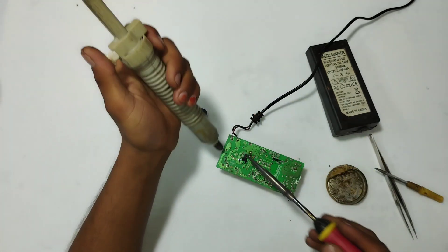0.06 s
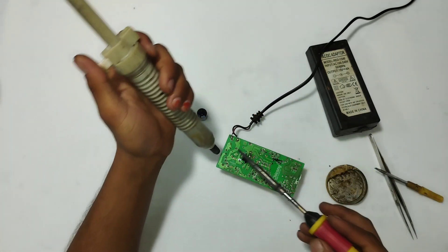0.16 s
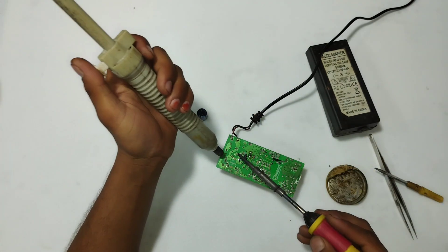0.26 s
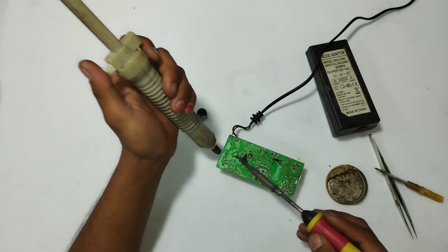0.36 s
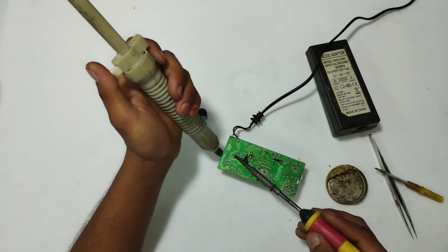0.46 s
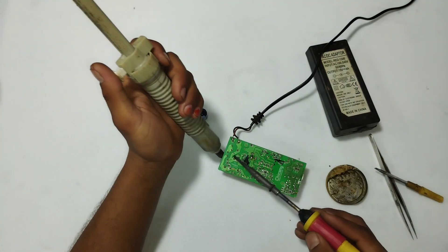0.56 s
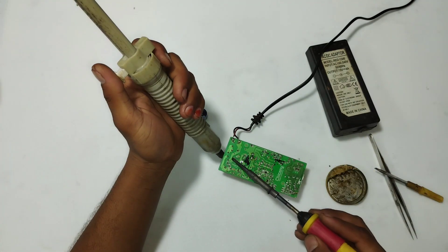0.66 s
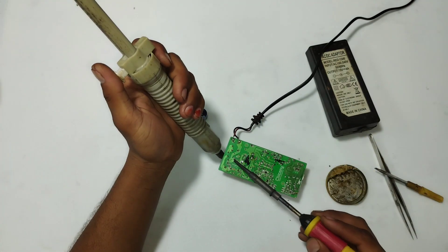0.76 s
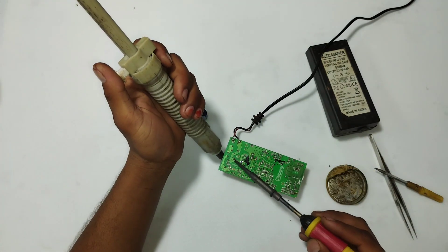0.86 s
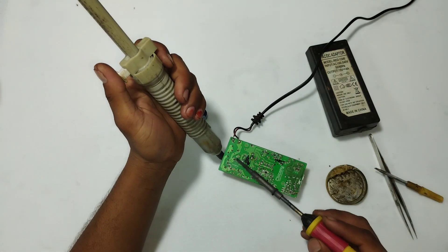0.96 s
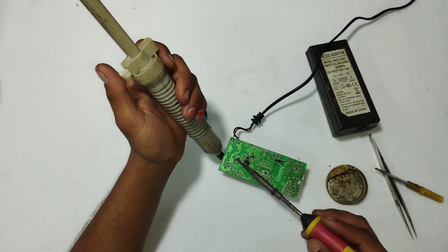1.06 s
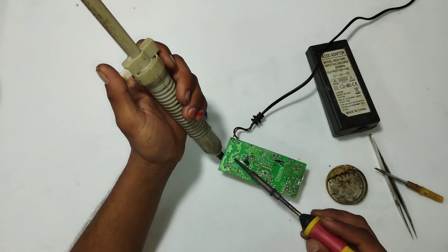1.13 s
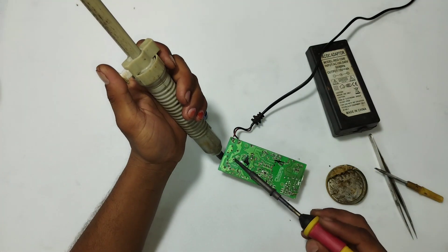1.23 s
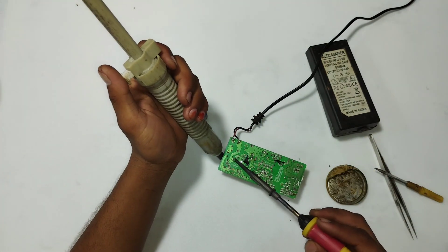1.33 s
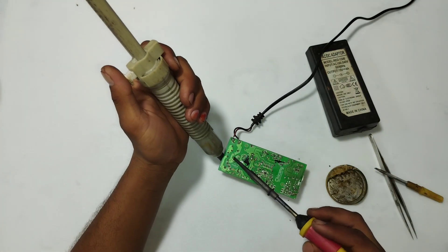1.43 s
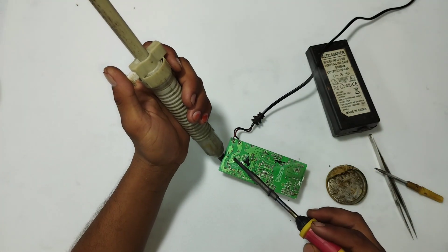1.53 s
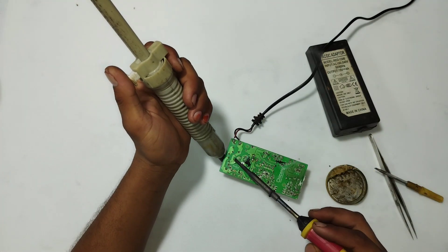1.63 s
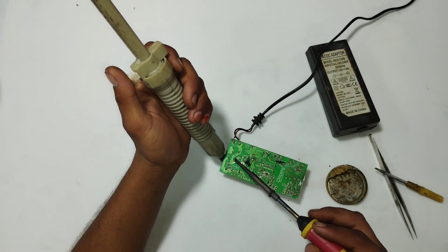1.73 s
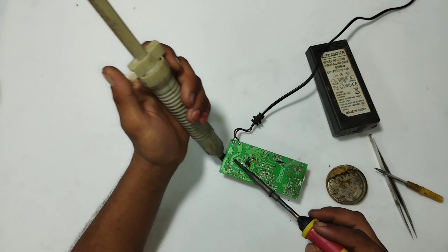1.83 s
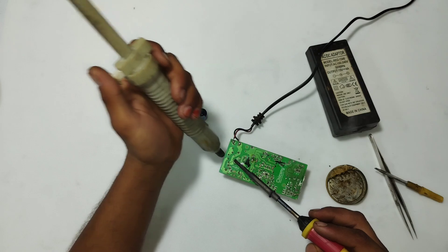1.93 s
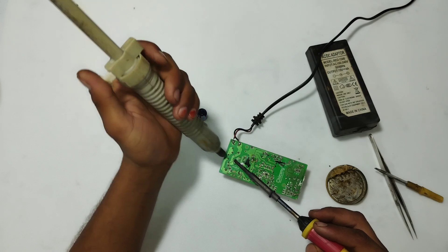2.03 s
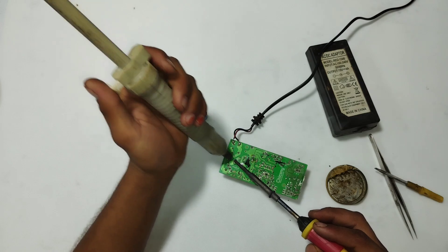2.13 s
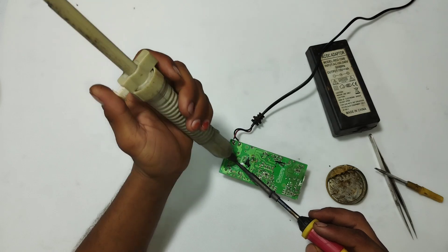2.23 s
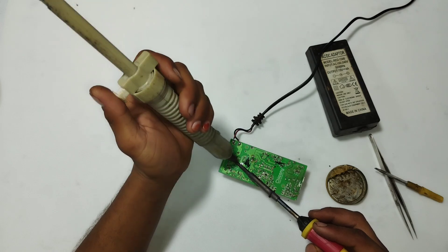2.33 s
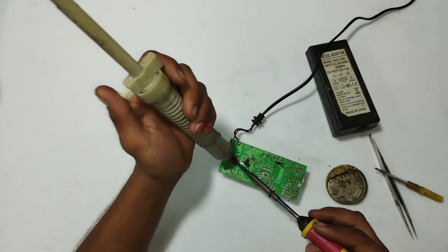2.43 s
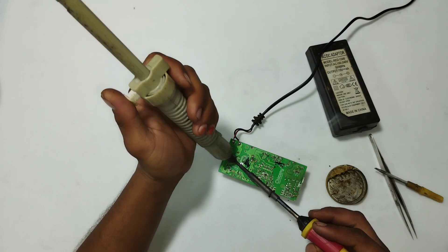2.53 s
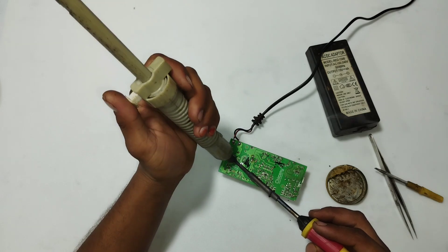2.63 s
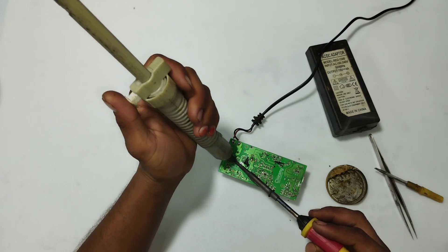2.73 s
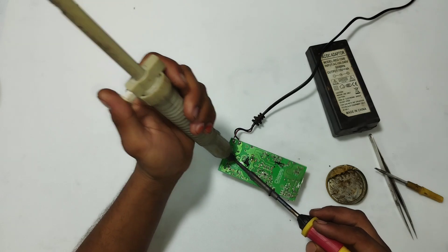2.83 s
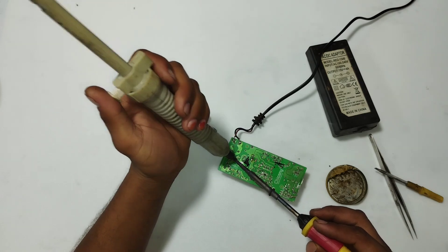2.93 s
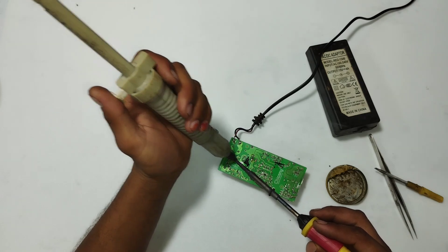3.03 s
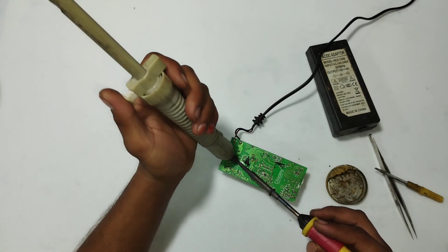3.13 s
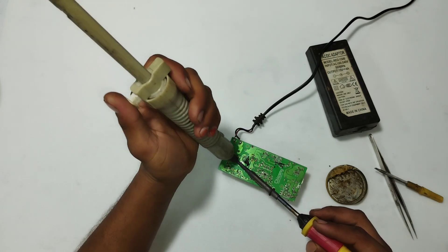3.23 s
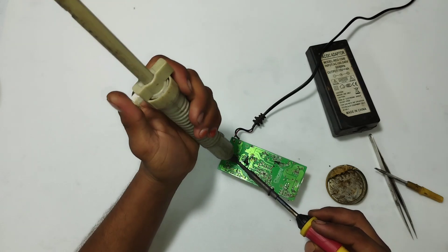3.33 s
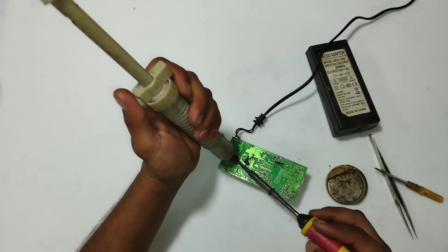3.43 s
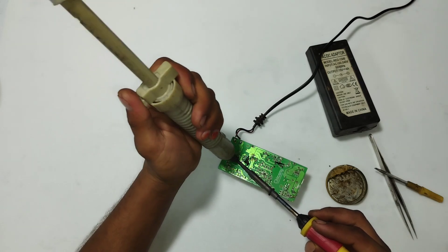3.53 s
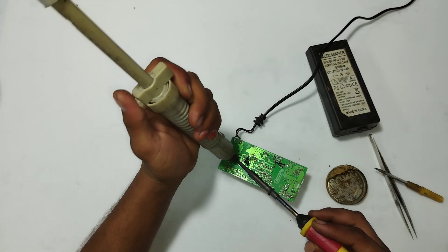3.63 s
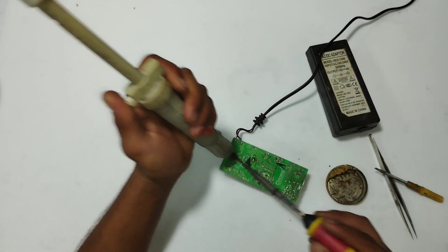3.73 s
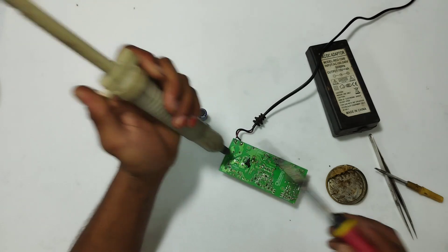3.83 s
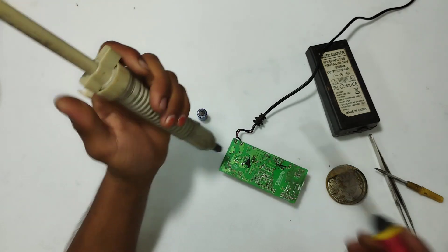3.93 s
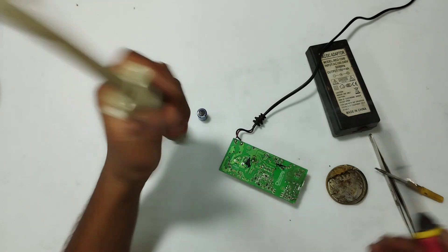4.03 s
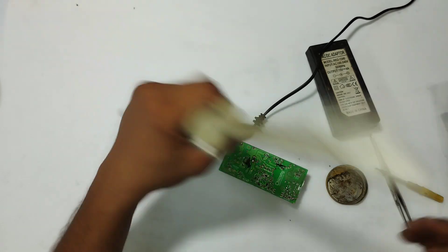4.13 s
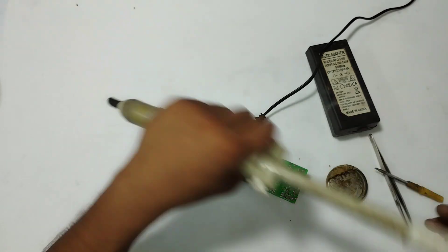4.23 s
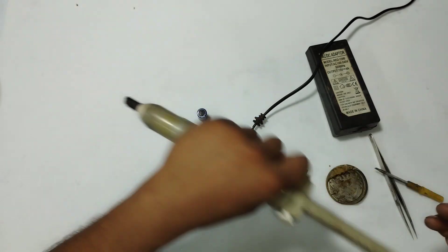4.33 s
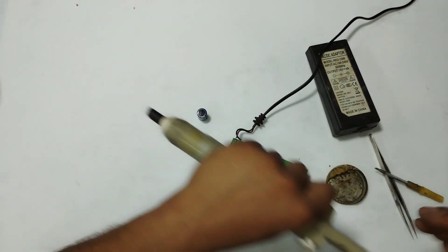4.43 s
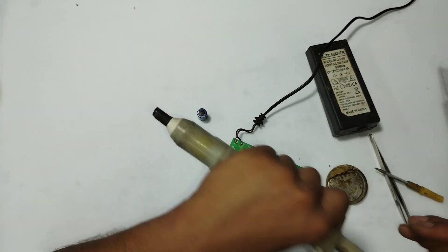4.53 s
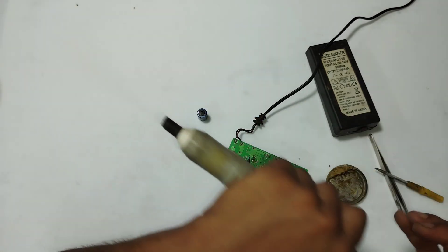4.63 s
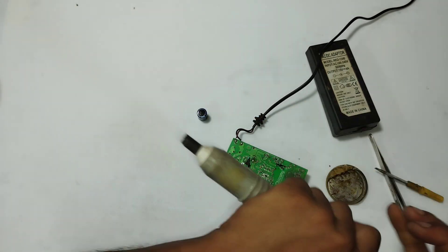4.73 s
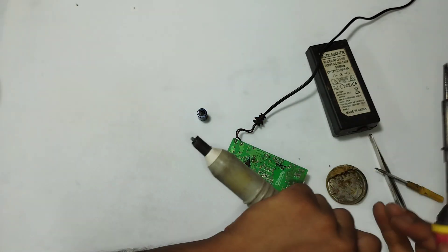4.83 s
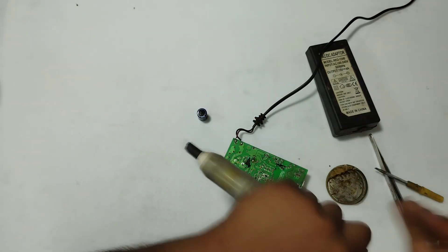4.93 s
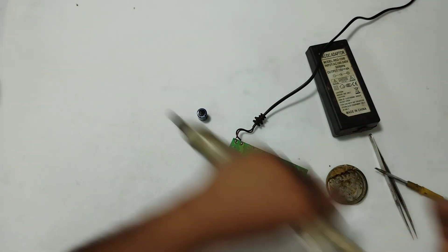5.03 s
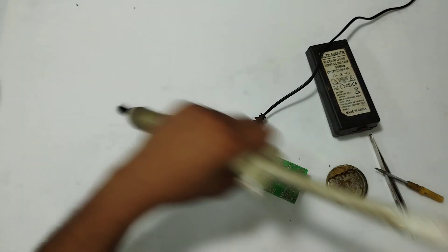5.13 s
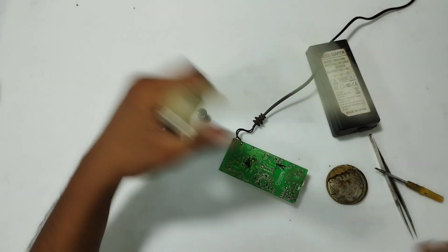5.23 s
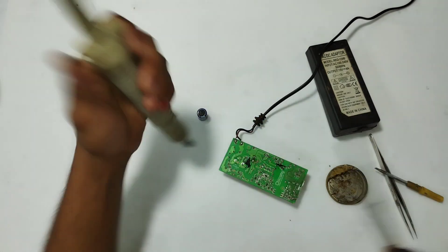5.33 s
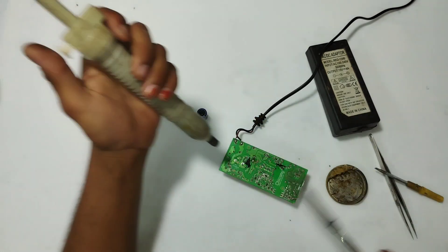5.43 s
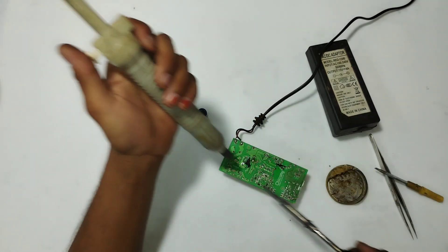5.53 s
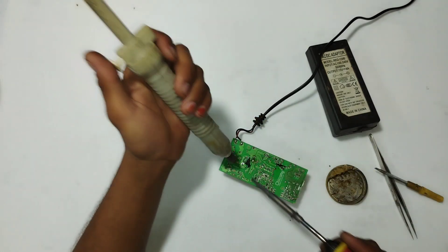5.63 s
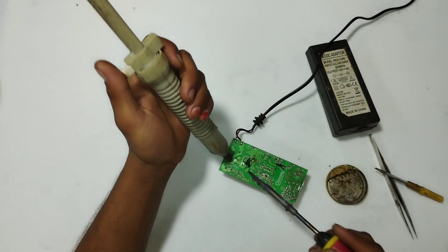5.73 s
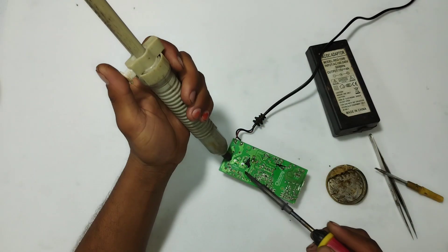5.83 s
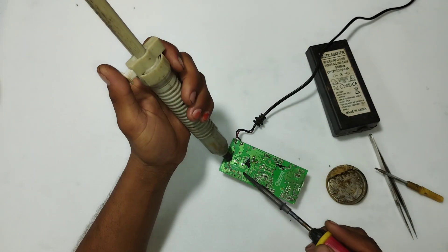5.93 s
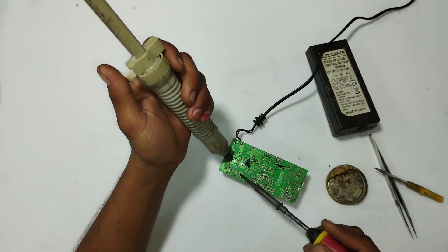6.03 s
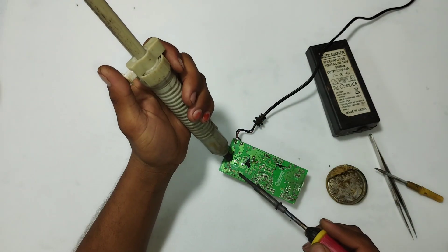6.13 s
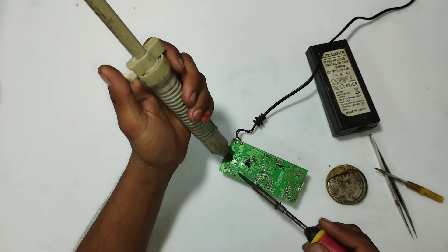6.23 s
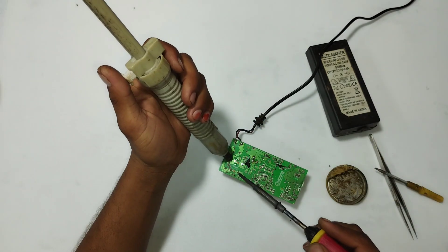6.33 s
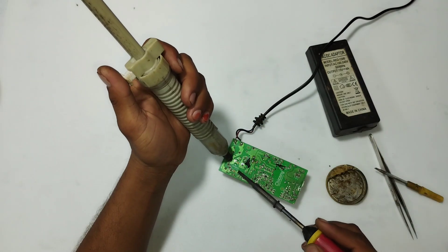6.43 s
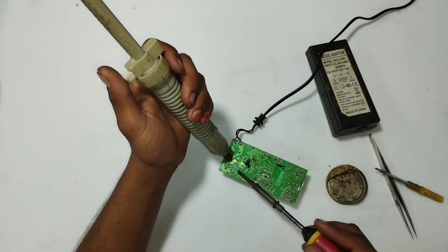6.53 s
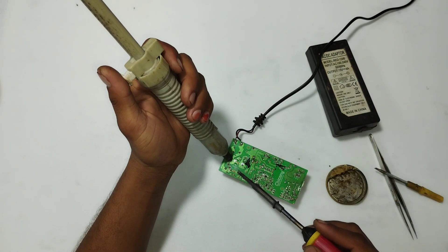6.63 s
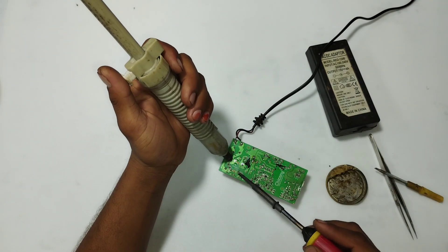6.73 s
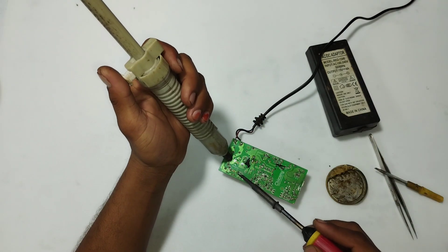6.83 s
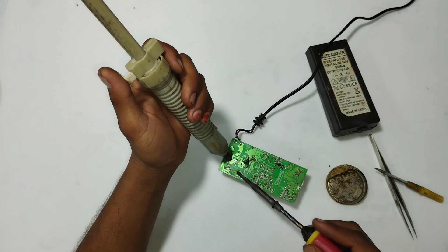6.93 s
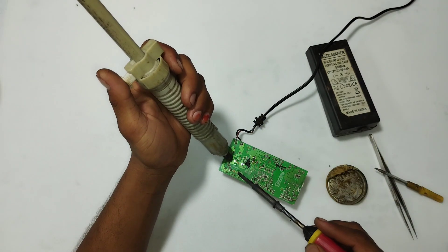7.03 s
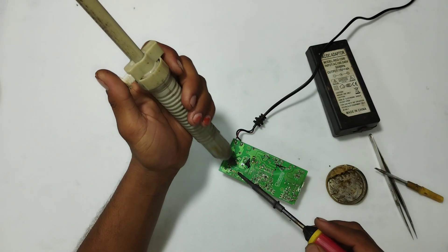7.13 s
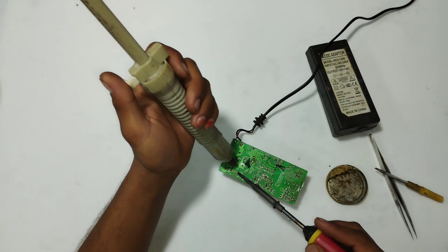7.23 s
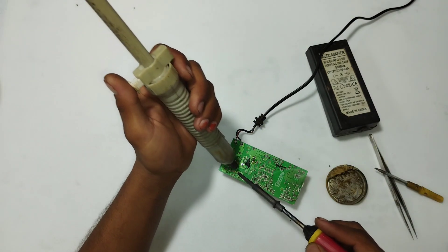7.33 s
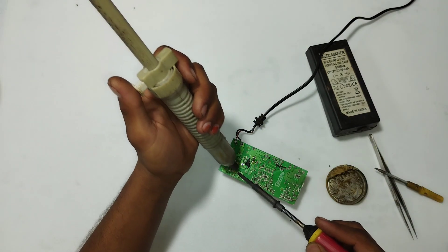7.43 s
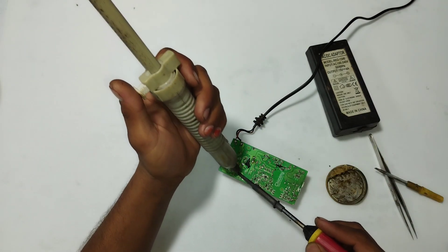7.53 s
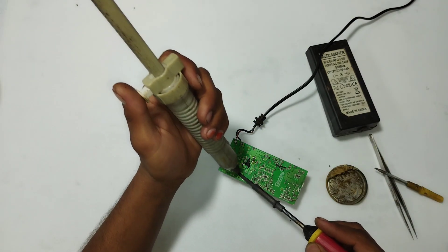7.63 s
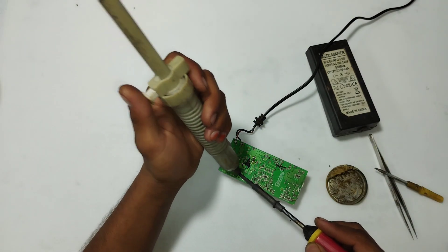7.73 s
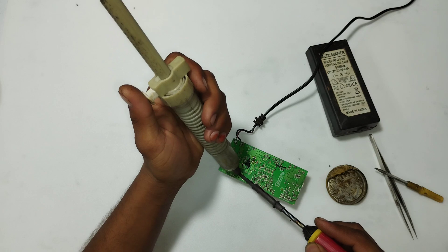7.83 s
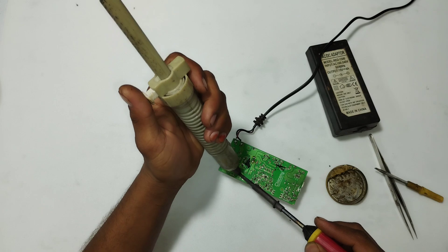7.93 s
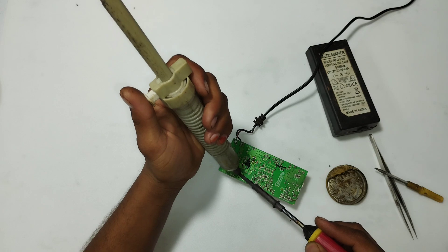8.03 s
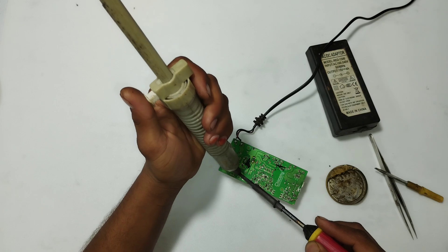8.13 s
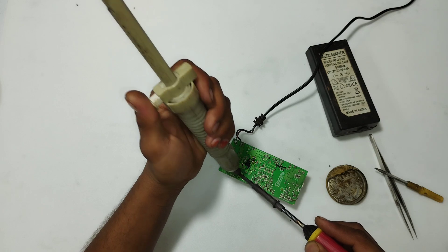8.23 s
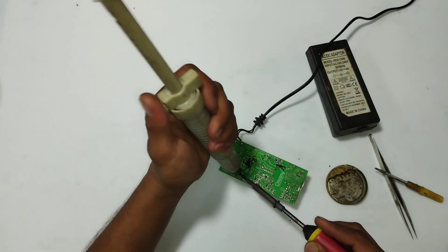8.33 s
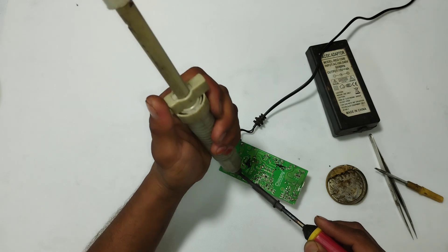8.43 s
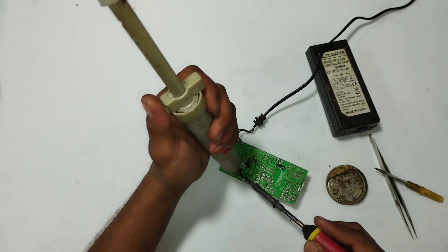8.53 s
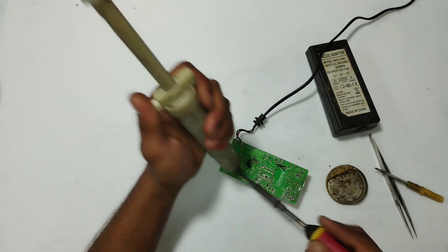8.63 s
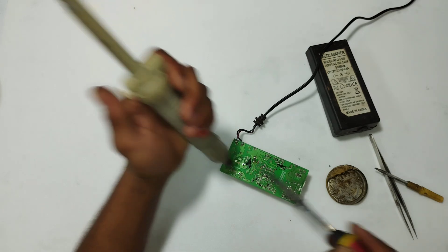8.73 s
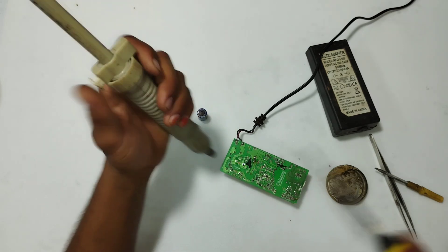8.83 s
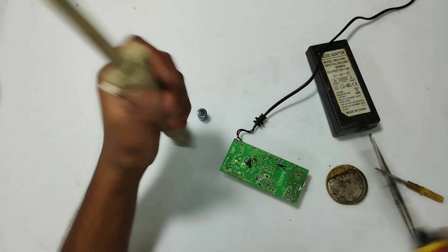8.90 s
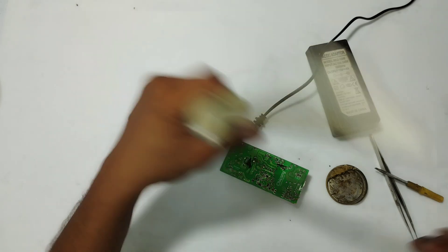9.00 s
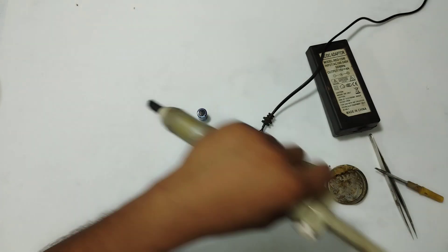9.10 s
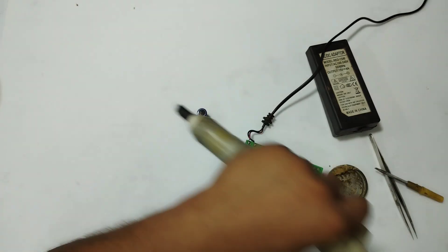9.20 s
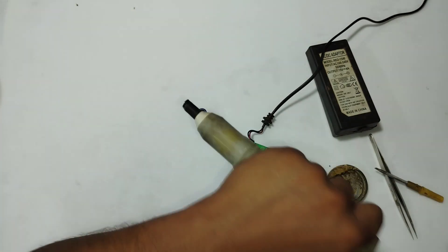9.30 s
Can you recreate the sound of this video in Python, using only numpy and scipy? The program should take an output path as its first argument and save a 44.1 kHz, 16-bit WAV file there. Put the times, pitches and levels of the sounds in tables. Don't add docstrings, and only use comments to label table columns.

```python
import sys
import numpy as np
from scipy import signal
from scipy.fft import rfft, irfft, next_fast_len
from scipy.io import wavfile
from scipy.ndimage import uniform_filter1d, map_coordinates

SR = 44100
rng = np.random.default_rng(int(sys.argv[2]) if len(sys.argv) > 2 else 0)


def to_linear_factor(level_db):
    exponent = np.asarray(level_db, float) / 20
    return 10 ** exponent


def unload_audio(sound):
    columns = np.transpose(np.atleast_2d(sound))
    steps = np.round(np.clip(columns, -1, 1) * 32767)
    wavfile.write(sys.argv[1], SR, steps.astype(np.int16))


N = 412776


def unit(x):
    return x / np.sqrt(np.mean(x ** 2) + 1e-20)


def along(points, hz):
    f, v = np.transpose(points)
    return np.interp(np.log(hz + 1), np.log(f + 1), v)


def curves(tables, silent):
    t = np.arange(N) / SR
    out = np.full((len(tables[0][0]) - 1, N), float(silent))
    for s, *cols in map(np.transpose, tables):
        inside = (t >= s[0]) & (t <= s[-1])
        out[:, inside] = [np.interp(t[inside], s, c) for c in cols]
    return out


def swells(rows, rise, fall):
    t = np.arange(N) / SR
    out = np.full(N, -150.)
    for a, b, first_db, last_db in rows:
        line = np.interp(t, [a, b], [first_db, last_db])
        line = line - rise * np.maximum(a - t, 0) - fall * np.maximum(t - b, 0)
        out = np.maximum(out, line)
    return out


def wobble(rate):
    knots = rng.standard_normal(int(N * rate / SR) + 4)
    return map_coordinates(knots, [np.arange(N) * rate / SR])


def filtered(x, response):
    m = next_fast_len(len(x) + 8192)
    return irfft(rfft(x, m) * response(np.fft.rfftfreq(m, 1 / SR)), m)[:len(x)]


def coloured(x, spectrum):
    return unit(filtered(x, lambda hz: to_linear_factor(along(spectrum, hz))))


def causal(spectrum):
    def response(hz):
        cepstrum = irfft(np.log(to_linear_factor(along(spectrum, hz)) + 1e-6))
        half = len(cepstrum) // 2
        cepstrum[1:half] *= 2
        cepstrum[half + 1:] = 0
        return np.exp(rfft(cepstrum))
    return response


def modes(table):
    def response(f):
        return sum((-1) ** k * to_linear_factor(db) * 1j * f * w / (c * c - f * f + 1j * f * w)
                   for k, (c, w, db) in enumerate(table))
    return response


def band(centre_hz, width_hz):
    def lowpass(hz):
        return 1 / (1 + (2 * hz / width_hz) ** 2)
    slow = [filtered(rng.standard_normal(N), lowpass) for _ in range(2)]
    phase = 2 * np.pi * np.cumsum(centre_hz) / SR
    return unit(slow[0] * np.cos(phase) + slow[1] * np.sin(phase))


def grit(rate, spread_db, share):
    size = rng.standard_normal(N) * to_linear_factor(spread_db * rng.exponential(size=N))
    clicks = (rng.random(N) < rate / SR) * size
    return np.sqrt(share) * unit(clicks) + np.sqrt(1 - share) * rng.standard_normal(N)


def patchy(x, depth_db):
    z = signal.stft(x, nperseg=256)[2]
    field = uniform_filter1d(rng.standard_normal(z.shape), size=4, axis=0)
    field = uniform_filter1d(field, size=14, axis=1)
    return unit(signal.istft(z * to_linear_factor(depth_db * unit(field)), nperseg=256)[1][:N])


def struck(out, s, table, db, rise=.0001):
    t = np.arange(SR // 5) / SR
    ring = np.zeros(len(t))
    for k, (hz, level, t60) in enumerate(table):
        decay = to_linear_factor(level - 60 * t / np.clip(t60, .01, .3))
        ring += (-1) ** k * decay * np.sin(2 * np.pi * hz * t)
    return out + to_linear_factor(db) * np.pad(ring * (1 - np.exp(-t / rise)), (round(s * SR), N))[:N]


# (time [s], level [dB])
RUMBLE = [(0.0, -48), (2.03, -47.5), (2.19, -44.5), (2.89, -48.5), (3.75, -47), (4.2, -49.5), (4.74, -46),
          (6.13, -49), (9.36, -50.5)]
# (frequency [Hz], level [dB per Hz])
RUMBLE_COLOUR = [(8.8, -36.5), (15, -2.5), (43, 2.5), (54, -2), (69, -17), (98, 0), (120, -5.5), (140, -15),
                 (166, -16.5), (231, -33.5), (300, -38), (390, -59), (660, -120)]
# (frequency [Hz], level [dB per Hz])
AIR_COLOUR = [(120, -32.5), (200, -7.5), (330, -5), (420, -3.5), (560, -8.5), (600, -5), (820, -11.5),
              (1000, -9.5), (2050, -14.5), (3700, -20.5), (7400, -23.5), (9400, -23), (15500, -28)]
# (frequency [Hz], level [dB rms])
HUM = [(398.4, -74), (592.2, -72.5), (985.1, -67.5), (2078, -79.5)]


def background():
    t = np.arange(N) / SR
    rumble_db = curves([RUMBLE], silent=-150)[0] + 1.1 + 0.88 * wobble(4)
    rumble = to_linear_factor(rumble_db) * coloured(rng.standard_normal(N), RUMBLE_COLOUR)
    air = to_linear_factor(-61.5 + .6 * wobble(4.7)) * coloured(rng.standard_normal(N), AIR_COLOUR)
    hum = np.zeros(N)
    for hz, db in HUM:
        hum += to_linear_factor(db + 1.5 + 0.59 * wobble(8.1)) * np.sin(2 * np.pi * hz * t + 0.51 * wobble(5.7))
    whine = to_linear_factor(-70.0) * band(np.full(N, 7330.), width_hz=1200)
    return rumble + air + hum + whine


# (frequency [Hz], t60 [s])
ROOM = [(100, 0.43), (1000, 0.14), (5000, 0.19), (14000, 0.06)]


def room(x):
    hz, t, z = signal.stft(rng.standard_normal(SR // 2), SR, nperseg=256)
    tail = signal.istft(z * to_linear_factor(-60 * t / along(ROOM, hz)[:, None]), SR, nperseg=256)[1]
    delayed = np.pad(x, (60, 0))
    return signal.fftconvolve(delayed, tail / np.linalg.norm(tail))[:N]


# (from [s], to [s], first level [dB], last level [dB])
SIMMER = [(.725, .81, -57, -43), (.81, 1.025, -49, -49.5), (1.265, 1.9, -51.5, -50), (1.9, 2.51, -51, -49),
          (2.51, 2.6, -48, -62), (2.6, 2.87, -49.5, -52.5), (2.87, 2.96, -54, -64), (2.96, 3.25, -67, -65),
          (3.26, 3.33, -59, -55), (6.55, 6.61, -60, -45.5), (6.61, 6.9, -47, -51.5),
          (6.9, 7.25, -51.5, -52.5), (7.25, 7.7, -53, -60), (7.7, 7.95, -59, -63), (7.95, 8.39, -65.5, -71)]
# (from [s], to [s], first level [dB], last level [dB])
BOIL = [(.73, 1.0, -54, -63), (1.5, 1.79, -61, -53), (1.79, 2.5, -53, -51), (2.6, 2.87, -70, -70),
        (2.89, 3.05, -57.5, -62), (6.61, 6.8, -61, -75), (6.86, 7.2, -51.5, -69), (7.25, 7.5, -54, -81)]
# (time [s], peak [dB])
POPS = [(0.7169, -44), (0.7263, -43), (0.7468, -42), (1.0975, -42), (1.1309, -33), (1.2531, -41),
        (1.271, -36), (1.2952, -32), (1.3368, -25.5), (1.4457, -33), (1.5455, -33), (1.6457, -36),
        (1.6863, -31), (1.7081, -38), (1.748, -22.5), (1.7824, -32), (1.8054, -31), (1.9376, -41),
        (1.9376, -21.5), (1.984, -31), (2.0379, -31), (2.0897, -26), (2.1573, -27), (2.197, -35),
        (2.2234, -36), (2.256, -26), (2.2747, -24), (2.3045, -24), (2.3472, -23), (2.3761, -28),
        (2.3997, -33), (2.428, -26.5), (2.4848, -31), (2.5073, -28), (2.5672, -43), (2.5968, -26),
        (2.618, -29), (2.6644, -31), (2.7263, -32), (2.7464, -25.5), (2.7928, -26.5), (2.8331, -35),
        (2.8625, -39), (2.8876, -25), (2.9214, -34),
        (6.5464, -45), (6.5678, -40.5), (6.5867, -36), (6.6092, -35), (6.6736, -34), (6.7953, -35),
              (6.9145, -28.5), (6.94, -29.5), (6.9973, -32), (7.0233, -33), (7.1206, -40), (7.2039, -38),
              (7.2293, -29.5), (7.2747, -37), (7.3031, -32), (7.3321, -31.5), (7.4169, -34.5),
              (7.4438, -37), (7.5066, -39), (7.6324, -44.5), (7.6856, -47), (7.7047, -32), (7.7441, -38.5),
              (7.7606, -35), (7.8963, -31.5), (7.9464, -40), (8.0644, -42.5), (8.1058, -39), (8.26, -45.5),
              (8.3403, -40)]
# (frequency [Hz], level [dB per Hz])
FINE_COLOUR = [(1760, -43), (3000, -14.5), (3730, -14), (4200, -14), (4470, -15), (8820, 1.5), (9600, -2),
               (14800, -0.5), (16000, -14.5)]
# (frequency [Hz], level [dB per Hz])
COARSE_COLOUR = [(1500, -32), (2800, -8.5), (4500, -6.5), (6000, -3), (8300, 0), (11000, -4.5),
                 (16000, -14)]
# (delay [s], gain)
ECHOES = [(.00082, .16), (.00193, -.25), (.00213, -.14), (.00305, .15)]


def flux():
    heat_rise, heat_fall = 490, 360
    pop_db, small_pops_per_s = 4.5, 50
    small_pop_db, small_spread_db = 13, 3
    fine_db = swells(SIMMER, heat_rise, heat_fall)
    coarse_db = swells(BOIL, heat_rise, heat_fall)
    when, size = rng.random((small_pops_per_s * 9, 2)).T * [[N - 2000], [1]]
    small_db = fine_db[when.astype(int)] + small_pop_db - pop_db + small_spread_db * (2 * size - 1)
    fine = to_linear_factor(1.5 * wobble(25)) * patchy(grit(rate=700, spread_db=1.8, share=.65), depth_db=1.5)
    coarse = grit(rate=300, spread_db=1.2, share=.85)

    pops, t = np.zeros(N), np.arange(1500) / SR
    for s, db in [*POPS, *zip(when / SR, small_db)]:
        burst = to_linear_factor(-18 - 60 * t / .025) * rng.standard_normal(len(t))
        burst[0] = rng.choice([-1, 1])
        pops[round((s + .0012) * SR):][:len(t)] += to_linear_factor(db + pop_db) * burst

    fizz = to_linear_factor(fine_db - 4.5) * unit(filtered(fine, causal(FINE_COLOUR)))
    fizz += to_linear_factor(coarse_db - 4.5) * unit(filtered(coarse, causal(COARSE_COLOUR)))
    bursts = filtered(pops, lambda hz: .8 * causal(COARSE_COLOUR)(hz) + .8 * causal(FINE_COLOUR)(hz))

    def comb(hz):
        return 1 + sum(gain * np.exp(-2j * np.pi * hz * s) for s, gain in ECHOES)
    return filtered(fizz + bursts, comb)


# (frequency [Hz], width [Hz], level [dB])
SHELL = [(6140, 1200, 1.5), (8016, 1300, 3.5), (11400, 4600, -2)]
# (frequency [Hz], width [Hz], level [dB])
BOARD = [(407, 200, -3), (734, 260, -2.5), (983, 220, 1.5), (1420, 1200, -11)]


def contacts(table, crack_db, width, rise, t60, side_db):
    out, t = np.zeros(N + SR), np.arange(SR // 5) / SR
    shape = to_linear_factor(-60 * t / t60) + to_linear_factor(crack_db - 60 * t / 0.0081)
    shape *= 1 - np.exp(-t / rise)
    blow = 6 * shape.max() * (np.arange(len(t)) == round(rise * SR))
    for s, db, barrel_db, barrel_hz, knock_db in table:
        barrel = [(barrel_hz, width * barrel_hz, 0),
                  (0.49 * barrel_hz, .3 * barrel_hz, side_db + 2),
                  (1.4 * barrel_hz, 0.22 * barrel_hz, side_db)]
        for body, level_db, order in ((SHELL, db, 1), (barrel, db + barrel_db, 2), (BOARD, db + knock_db, 1)):
            hit = blow + shape * rng.standard_normal(len(t))
            ring = filtered(hit, lambda hz: modes(body)(hz) ** order / (1 + 1j * hz / 9000))
            out[round(s * SR):][:len(t)] += to_linear_factor(level_db) * ring / np.max(np.abs(ring))
    return out[:N]


# (time [s], peak [dB], barrel [dB], barrel pitch [Hz], knock [dB])
TOUCHES = [(1.1313, -41, 2.5, 1850, 1), (1.133, -49.5, 5, 3400, 4), (1.708, -39, -2, 2740, -14),
           (3.4665, -35.5, -11, 5600, -20.5), (3.4695, -39, 9.5, 3580, -21.5), (3.508, -41, 4, 1290, 1),
           (3.6945, -35, 0.5, 3970, -12.5), (3.792, -53, 5, 2900, -14), (3.7998, -40, -2, 1990, -16),
           (3.8203, -40, 15.5, 3620, -9), (3.8555, -39, 13, 3300, 2), (3.859, -42.5, 14.5, 2320, 4),
           (3.9744, -49, -0.5, 2700, -6.5), (3.978, -54, 6, 4600, -12), (4.201, -41, -6.5, 4220, -13),
           (5.059, -45, -0.5, 2500, -14), (5.072, -39.5, 13.5, 2390, -16.5), (6.2253, -48.5, 9, 2390, -2.5),
           (6.227, -57, 10, 5210, 5), (7.1206, -51, 4.5, 3830, 1.5), (8.4025, -48, 2.5, 3180, -18.5),
           (8.411, -50.5, 11.5, 3300, -11), (8.425, -54.5, 7, 3000, -12.5), (8.44, -53, 5.5, 2900, -16.5),
           (8.5919, -30, 2, 3620, -9), (8.597, -33, 4.5, 7000, -13.5), (8.7555, -43.5, -11.5, 2090, -15),
           (8.8593, -42, 0, 3040, -13.5)]
# (time [s], peak [dB])
TICKS = [(1.0974, -52), (3.258, -46), (3.3006, -32), (5.5318, -40), (5.579, -43.5), (9.0795, -47)]
# (barrel [dB], barrel pitch [Hz], knock [dB])
TICK_COLOUR = (-23, 2540, -21)
# (time [s], peak [dB])
BUMPS = [(1.543, -63), (3.425, -66.5), (6.331, -66), (6.53, -70)]
# (barrel [dB], barrel pitch [Hz], knock [dB])
BUMP_COLOUR = (3, 1300, 20.4)


def touches():
    light = TOUCHES + [(*row, *TICK_COLOUR) for row in TICKS]
    dull = [(*row, *BUMP_COLOUR) for row in BUMPS]
    taps = contacts(light, crack_db=8, width=.36, rise=.0008, t60=.028, side_db=-17)
    return taps + contacts(dull, crack_db=4, width=.36, rise=.0006, t60=.055, side_db=-14)


# (frequency [Hz], level [dB], t60 [s], pitch overshoot)
BENCH = [(92.4, -1, .46, 1), (150, -18, .45, .2), (202, -9, 0.11, 0.034), (267, -13, .1, .03),
         (377.3, -17, 0.22, 0.055), (530, -13.5, .12, 0.044)]
# (time [s], peak [dB], frequency [Hz], t60 [s])
NUDGES = [(1.135, -38, 384, 0.044), (1.711, -37, 396, 0.04), (2.994, -41, 383, 0.095),
          (3.469, -38.5, 3650, .07), (3.69, -58, 3050, .5), (3.863, -23.5, 97, 0.32),
          (3.863, -39, 184, 0.36), (4.931, -18, 391, 0.082), (6.229, -48, 410, 0.1),
          (7.123, -38.5, 394, 0.077)]


def bench():
    u, out = np.arange(SR // 2) / SR, np.zeros(N + SR)
    held = 5 * (u / .12) ** 3
    heavy = [(s + 0.0015, db + level, hz, t60, over)
             for s, db, *_ in RELEASES for hz, level, t60, over in BENCH]
    for s, db, hz, t60, overshoot in heavy + [(*row, .08) for row in NUDGES]:
        cycles = hz * (u + overshoot * 0.0063 * (1 - np.exp(-u / 0.0036)))
        envelope = to_linear_factor(db - 60 * u / t60 - held) * (1 - np.exp(-u / 0.0047))
        out[round(s * SR):][:len(u)] += envelope * np.sin(2 * np.pi * cycles)
    return out[:N]


# (time [s], level [dB], t60 [s])
DROP = [
    (3.8575, -18.5, 0.15),
    (3.865, -19, 0.037),
    (3.873, -28.5, 0.19),
]
# (frequency [Hz], level [dB per Hz])
CLATTER_COLOUR = [(150, -31), (260, -8), (377, 2), (631, -7.5), (748, -7), (984, -2.5), (1560, -14),
                  (1820, -19), (1950, -17.5), (3100, -21.5), (4220, -31), (8100, -29.5), (15000, -50)]
# (frequency [Hz], level [dB], t60 [s])
BOARD_RING = [(411, -4.5, 0.14), (517, -10, 0.041), (654, -14, .04), (765, 2.5, 0.052), (870, -9, .04),
              (948, 5.5, 0.059), (1130, -2, 0.044), (1330, -12, .06), (1566, -3, .04), (1900, -11, 0.024)]


def drop():
    t = np.arange(N) / SR
    shape = np.zeros(N)
    for s, db, t60 in DROP:
        shape += to_linear_factor(db - 60 * np.maximum(t - s, 0) / t60) * np.clip((t - s) / 0.0006, 0, 1)
    out = to_linear_factor(-1.5) * shape * coloured(rng.standard_normal(N), CLATTER_COLOUR)
    for s, db, _ in DROP:
        out = struck(out, s, BOARD_RING, db - 4, rise=0.001)
    return out


# (time [s], bench [dB], rattle [dB], spring [dB], spring slaps back after [s])
RELEASES = [
    (3.5325, -17, -14, -17.5, 0.024),
    (8.456, -15, -14.5, -14, .019),
]
# (frequency [Hz], level [dB per Hz])
RATTLE_COLOUR = [(290, -46), (500, -15.5), (578, -22.5), (729, -16.5), (1210, -25), (2650, -14),
                 (4100, -16.5), (5800, -9), (9630, -7.5), (12000, -14.5), (14900, -14), (16000, -27.5)]
# (frequency [Hz], width [Hz], level [dB])
SPRING = [(9320, 500, -4), (9615, 270, 1.5), (9720, 290, -0.5)]
# (time [s], peak [dB], frequency [Hz])
REBOUNDS = [
    (3.553, 3.5, 9500),
    (3.5579, -3, 9500),
    (8.4742, 6, 10340),
]
# (frequency [Hz], level [dB], t60 [s])
COILS = [
    [(4970, -7.5, 0.13), (5410, -16.5, 0.32), (7000, -1.5, 0.11), (7750, 1, 0.1), (9200, 0, 0.13),
     (9884, 1, 0.12), (11020, -12.5, 0.15), (12200, -23.5, 0.25)],
    [(2642, -13, 0.18), (7100, -13, 0.38), (8656, -6, 0.13), (9345, 1, 0.14), (9700, -7.5, 0.31),
     (10140, -15, 0.42), (12100, -12, 0.13), (12720, -13.5, 0.16)],
]
# (frequency [Hz], level [dB], t60 [s])
STOP = [(1901, -6.5, 0.056), (2900, -4, .035), (3510, -10.5, 0.067), (5600, -5.5, .05), (6250, -1, .03)]


def recoil():
    peak_s = 0.0034
    early_db = -15.5
    shaken, singing = [], []
    for s, _, loose_db, coil_db, back in RELEASES:
        shaken.append((s + peak_s, s + peak_s + .001, loose_db, loose_db))
        singing.append((s + peak_s, s + back, coil_db + early_db, coil_db + early_db))
        singing.append((s + back, s + back + .001, coil_db, coil_db))
    rattle_db = swells(shaken, rise=6000, fall=297)
    spring_db = swells(singing, rise=3000, fall=280)
    shaking = to_linear_factor(1.1 * wobble(300) + 0.5 * wobble(83))
    rattle = coloured(shaking * rng.standard_normal(N), RATTLE_COLOUR)
    spring = to_linear_factor(spring_db - 2.0) * unit(filtered(rng.standard_normal(N), modes(SPRING)))
    slaps = np.zeros(N)
    for s, db, hz in REBOUNDS:
        slap = [(hz, 0, .011), (0.84 * hz, -6, .012), (0.87 * hz, -9, .01)]
        slaps = struck(slaps, s + .001, slap, db - 7.5)
    for (s, _, _, _, back), coil in zip(RELEASES, COILS):
        slaps = struck(slaps, s + back, coil, -25)
        slaps = struck(slaps, s + .0015, STOP, -14, rise=.0008)
    return to_linear_factor(rattle_db + 3.5) * rattle + spring + slaps


# (from [s], to [s], first effort [dB], last effort [dB])
STROKES = [(3.467, 3.476, -52, -56), (3.476, 3.53, -60, -59), (3.822, 3.855, -58, -69),
           (5.059, 5.066, -54, -50), (4.547, 4.558, -32.5, -32), (4.558, 4.6, -22.5, -17.5),
           (4.692, 4.708, -37, -23.5), (4.708, 4.74, -23, -20.5), (4.74, 4.846, -21, -10.5),
           (4.846, 4.928, -11, -14), (5.068, 5.078, -44, -25), (5.081, 5.084, -12.5, -16),
           (5.13, 5.143, -29, -24.5), (5.145, 5.165, -18.5, -14), (5.169, 5.2, -9.5, -11),
           (5.2, 5.236, -7, -13.5), (5.238, 5.31, -15, -40), (9.33, 9.349, -30, -14),
           (9.349, 9.37, -17, -7)]
# (time [s], level [dB], half length [s])
SLIPS = [(4.699, 7, .003), (4.71, 3, 0.0027), (4.718, -4, .003), (4.724, 5.5, .005), (4.747, 3.5, 0.0027),
         (4.755, -2.5, .005), (4.769, 8.5, 0.0027), (4.787, -3.5, .004), (4.792, 0, .002),
         (4.811, -2.5, .002), (4.829, 2, .003), (4.844, 1, 0.0037), (4.864, 1, .003), (4.87, -3.5, .004),
         (4.886, 3, .004), (4.907, 1.5, .003), (4.914, -3.5, .005), (5.203, -2, .003), (5.232, 2, .004),
         (9.351, 3, 0.0026)]
# (time [s], pipe [Hz], whistle [Hz], whistle level [dB])
TRAVEL = [(4.5, 2540, 8300, -15), (4.61, 2348, 8134, 5), (4.66, 2332, 8037, -3), (4.71, 2340, 8740, -4.5),
          (4.93, 2202, 8726, -12.5), (5.08, 2197, 7990, -17.5), (5.17, 2135, 7930, -5.5),
          (5.235, 2405, 8360, -9.5), (9.36, 2570, 8440, -1)]
# (time [s], share [0-1])
SINGING = [(4.5, 0.8), (4.915, 0.79), (4.93, 0.3), (9.2, 0.28), (9.3, 0.6), (9.36, 0.86)]
# (frequency [Hz], level [dB per Hz])
SCRAPE_COLOUR = [(2000, -43.5), (3500, -21.5), (4400, -15.5), (5600, -11.5), (6960, -5), (8490, -4.5),
                 (12400, -8), (14900, -12.5), (16000, -19.5)]
# (frequency [Hz], level [dB per Hz])
WALL_COLOUR = [(150, -41.5), (250, -17), (400, -12.5), (467, -13.5), (586, -18), (1460, -10), (1870, -4.5),
               (3500, -3.5), (4550, -31.5), (7700, -120)]


def plunger():
    t = np.arange(N) / SR
    hiss_db = swells(STROKES, rise=4500, fall=330)
    for s, db, half in SLIPS:
        hiss_db += db * np.exp(-((t - s) / half) ** 2)
    pipe_db = 0.85 * hiss_db - 22.5
    pipe_hz, whistle_hz, whistle_db = curves([TRAVEL], silent=0)
    singing = curves([SINGING], silent=0)[0]
    judder = to_linear_factor(.4 * wobble(70) + .9 * wobble(500))
    scrape = patchy(coloured(grit(rate=8000, spread_db=1.2, share=0.55), SCRAPE_COLOUR), depth_db=1.8)
    whistle = to_linear_factor(whistle_db) * band(whistle_hz, width_hz=900)
    overtone = to_linear_factor(3.5 - np.clip(86 * (t - 4.8), 0, 5))
    column = to_linear_factor(1.8 * wobble(50)) * band(pipe_hz, width_hz=300)
    column += overtone * band(2.07 * pipe_hz, width_hz=400)
    wall = to_linear_factor(2.5) * coloured(rng.standard_normal(N), WALL_COLOUR)
    barrel = np.sqrt(singing) * column + np.sqrt(1 - singing) * wall
    return judder * (to_linear_factor(hiss_db - 1.5) * (scrape + whistle) + to_linear_factor(pipe_db) * barrel)


# (time [s], peak [dB], barrel [dB], barrel pitch [Hz], knock [dB])
SLAMS = [(4.6054, -2, -13, 2260, -18), (4.7257, -13, -15.5, 4870, -23.5), (4.7621, -8, -24, 4490, -45),
         (4.8813, -10.5, -18.5, 2203, -49), (4.9242, 3, -21.5, 1600, -25.5),
         (5.0804, -5.5, -8.5, 4770, -16.5), (5.0905, -12, -17, 4230, -30),
         (5.1442, -10.5, -25.5, 2260, -44), (5.2404, -6.5, -11, 2400, -18.5),
         (8.4577, -6.5, -3.5, 2993, -15.5), (8.4626, -3.5, -10, 2190, -11), (9.3411, -19.5, -34, 2620, -46),
         (9.3468, -15, -27, 4720, -53.5),
         (3.5335, -2, -6, 2885, -21),
]


def slams():
    return contacts(SLAMS, crack_db=9.5, width=0.49, rise=0.0018, t60=0.024, side_db=-13)


def scene():
    slam, touch, sizzle = slams(), touches(), flux()
    wet = room(to_linear_factor(-7) * slam + to_linear_factor(-9) * touch + to_linear_factor(-6.5) * sizzle)
    mono = background() + wet + sizzle + touch + bench() + drop() + recoil() + plunger() + slam
    return np.array([mono, mono])


def band_limit(x):
    return signal.sosfilt(signal.butter(12, 16670, fs=SR, output="sos"), x)


def record(dry):
    mono = filtered(dry[0], lambda hz: 1 / (1 + (hz / 15700) ** 200))
    mono = mono / (1 + np.abs(mono) ** 12) ** (1 / 12)
    return band_limit(np.array([mono, mono]))


dry = scene()
out = record(dry)
unload_audio(out)
```